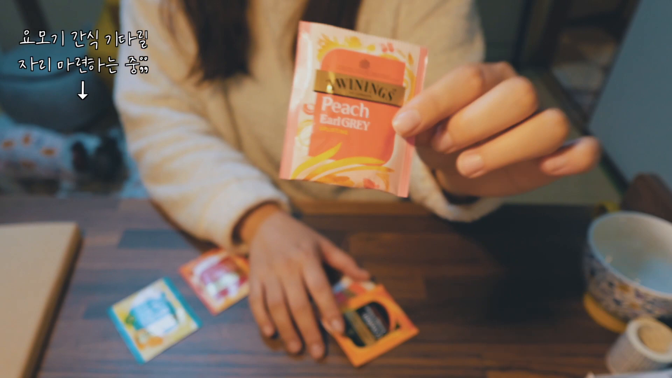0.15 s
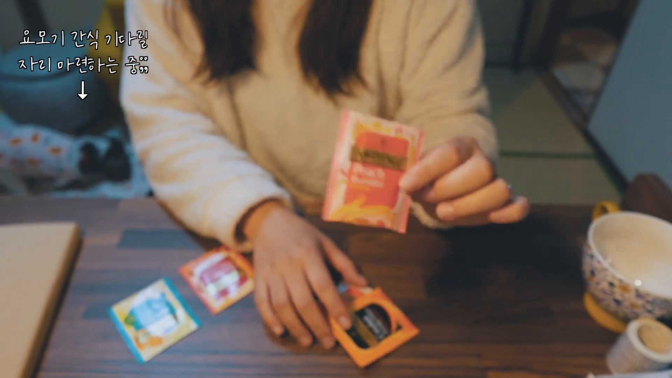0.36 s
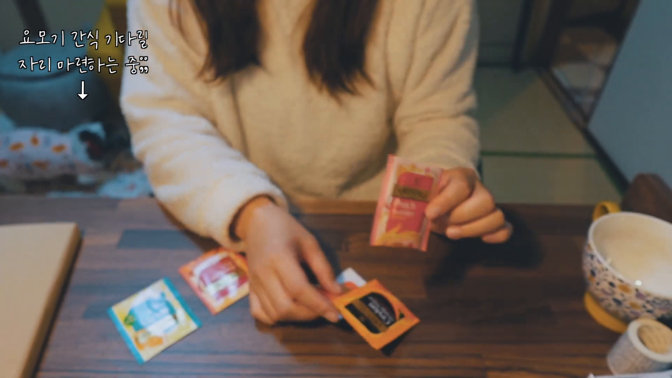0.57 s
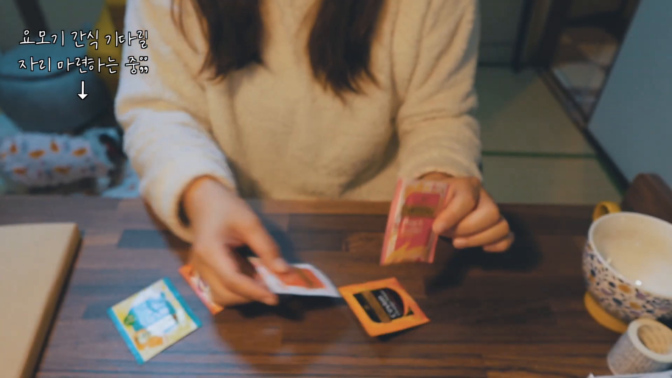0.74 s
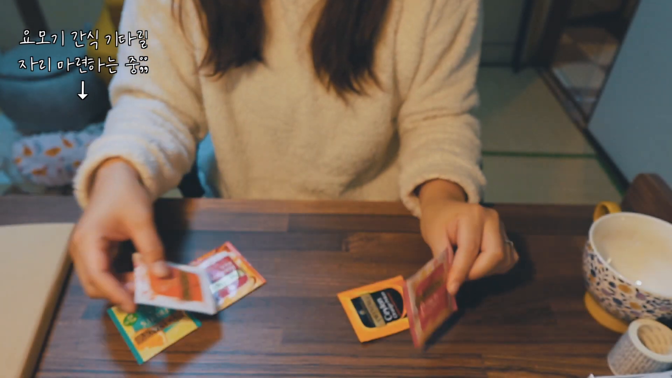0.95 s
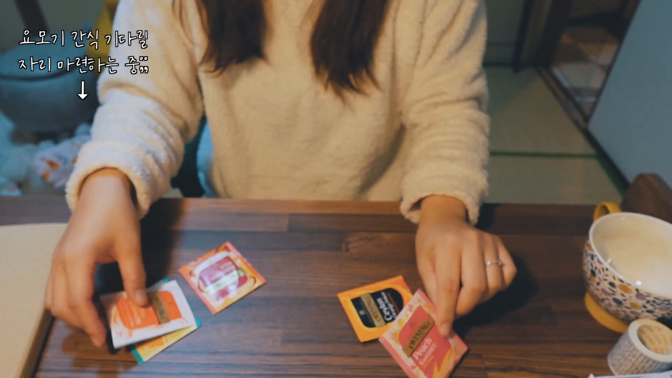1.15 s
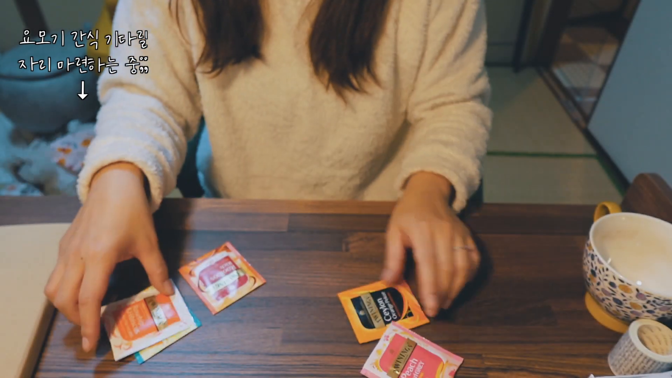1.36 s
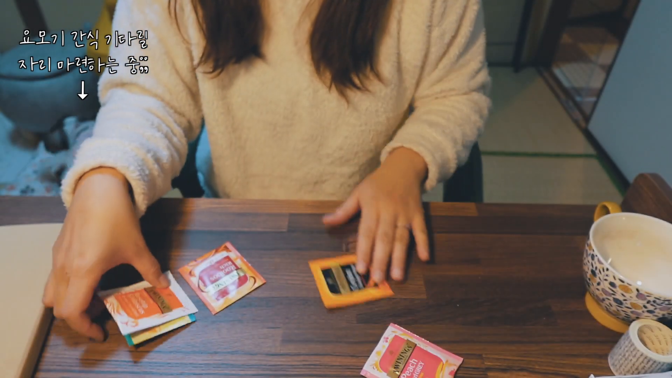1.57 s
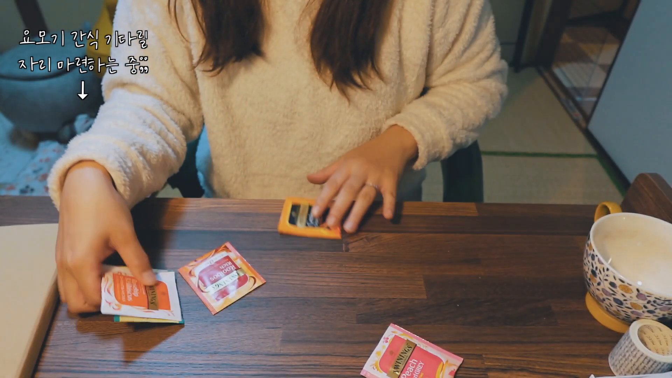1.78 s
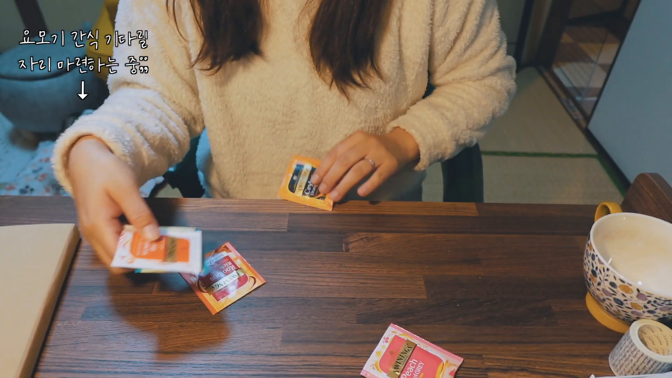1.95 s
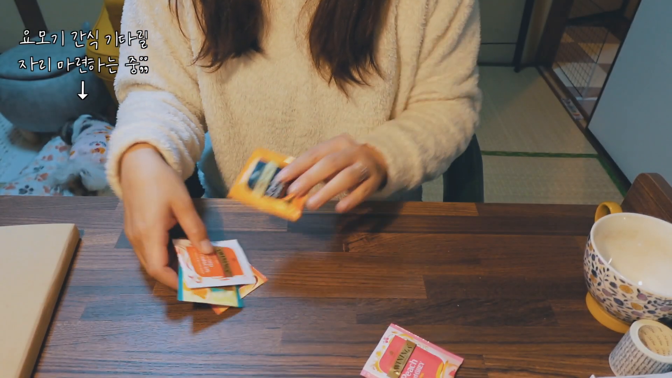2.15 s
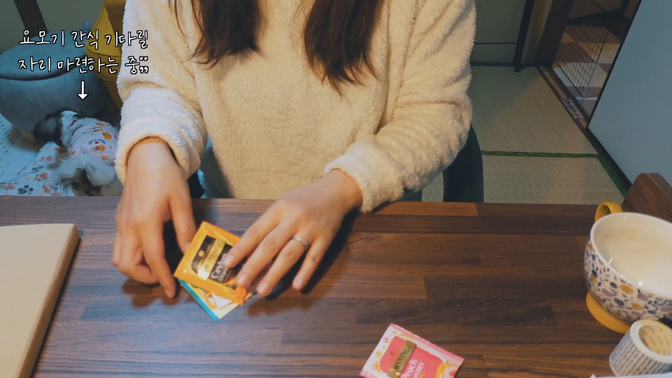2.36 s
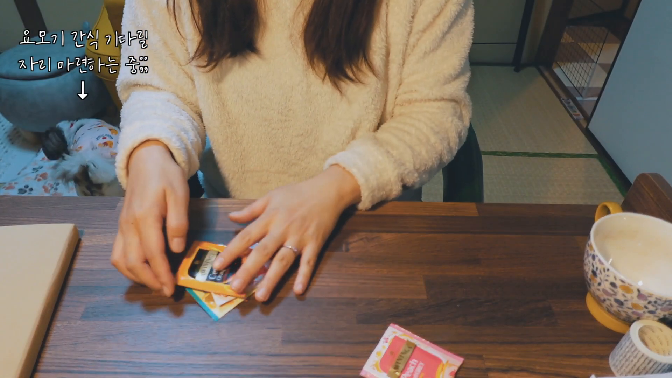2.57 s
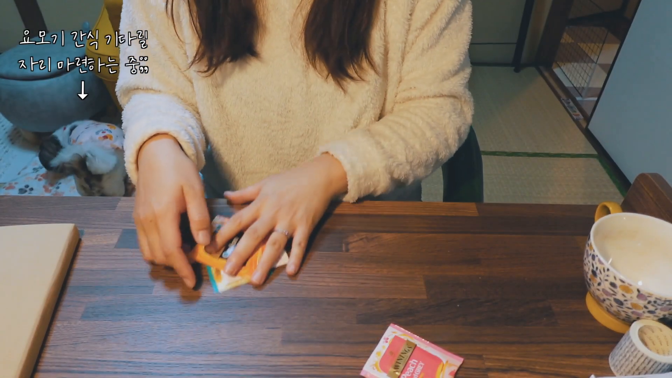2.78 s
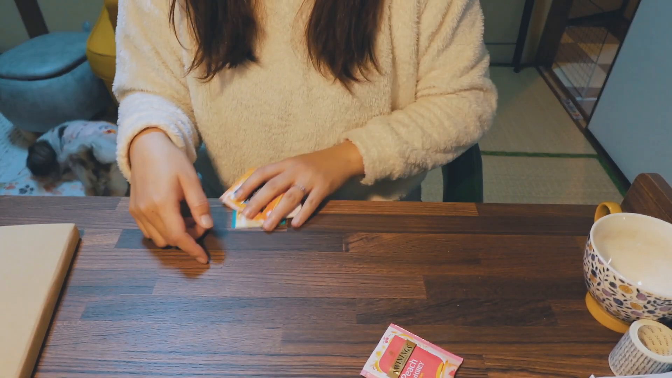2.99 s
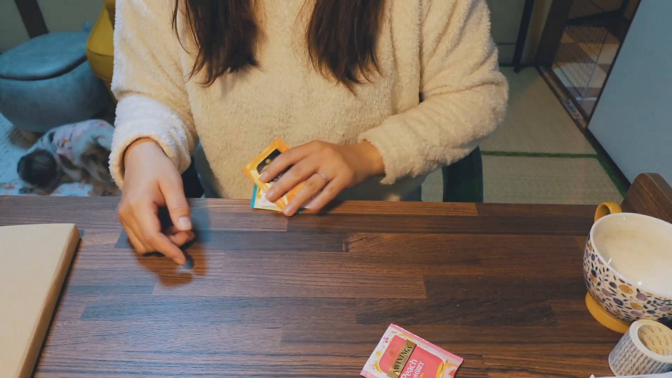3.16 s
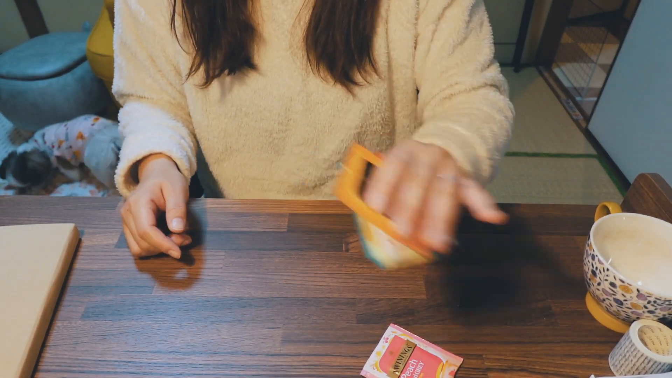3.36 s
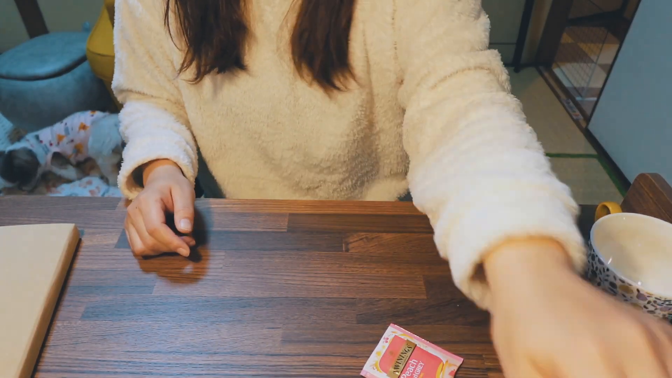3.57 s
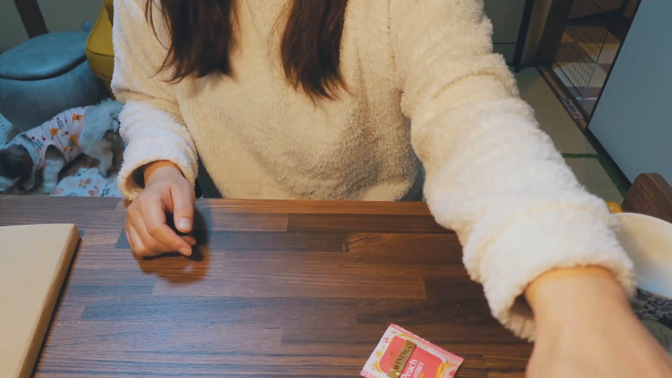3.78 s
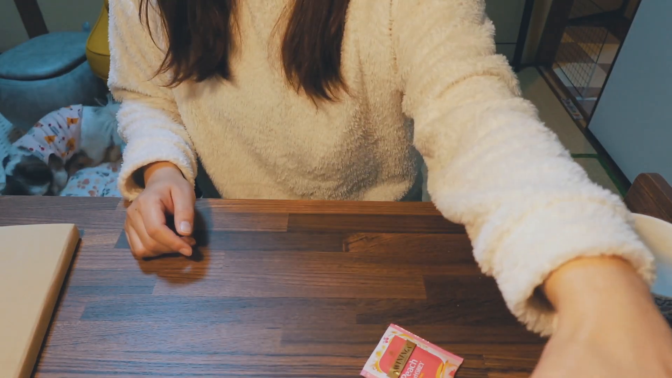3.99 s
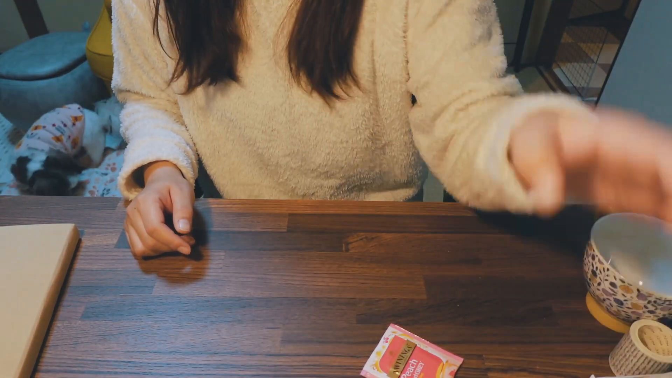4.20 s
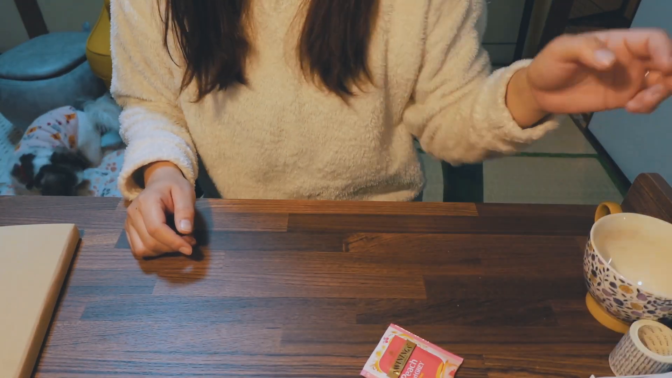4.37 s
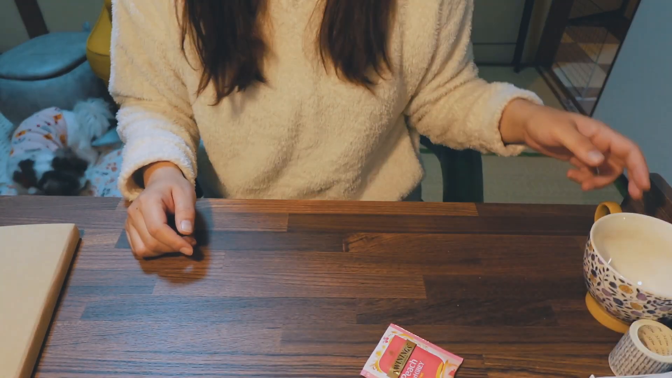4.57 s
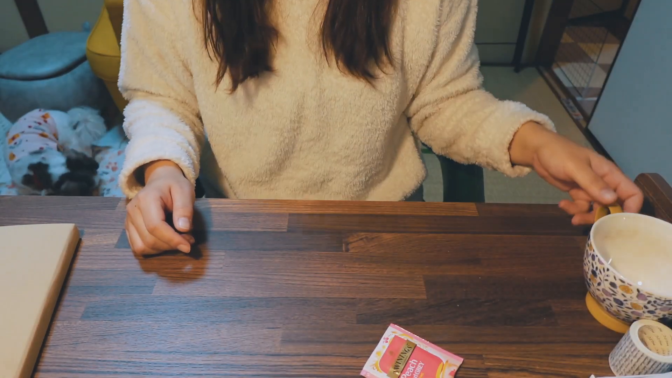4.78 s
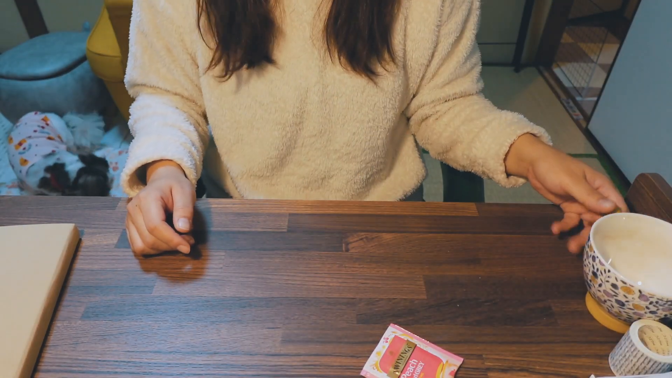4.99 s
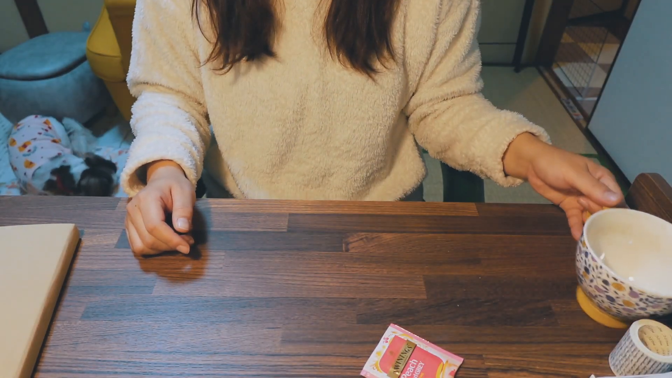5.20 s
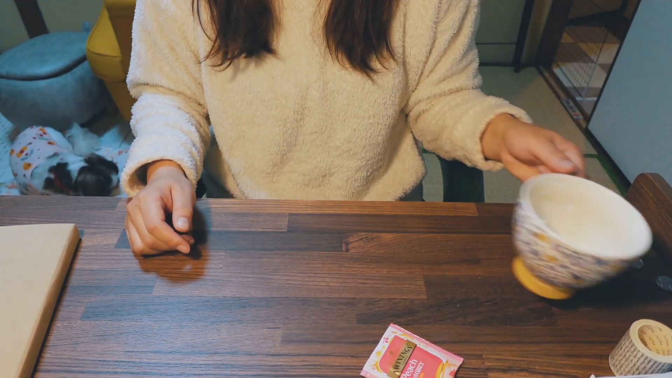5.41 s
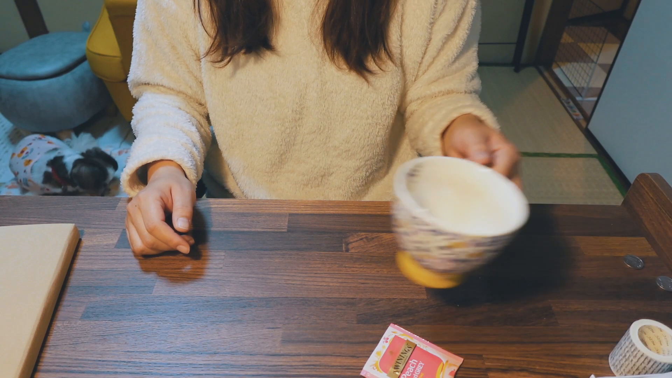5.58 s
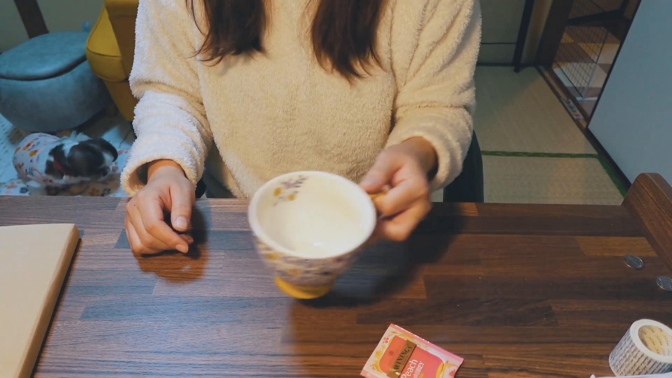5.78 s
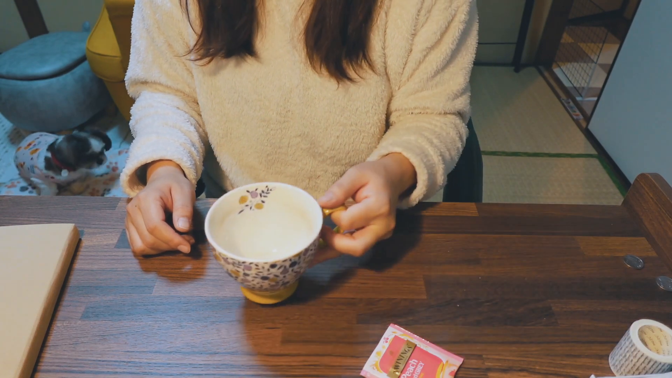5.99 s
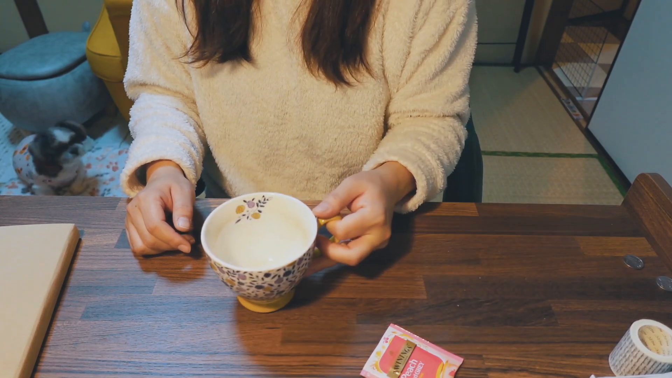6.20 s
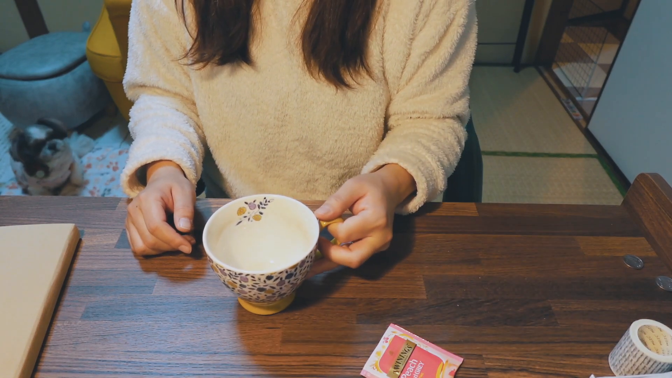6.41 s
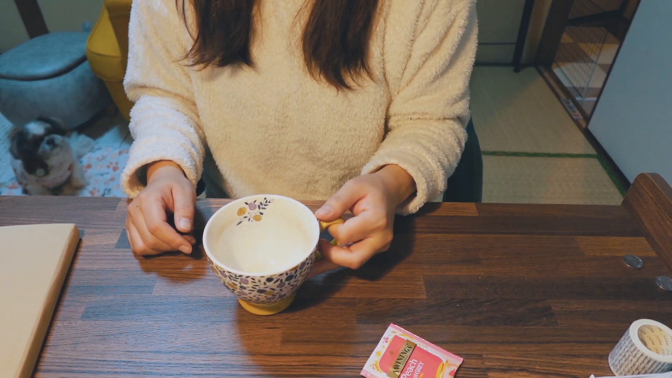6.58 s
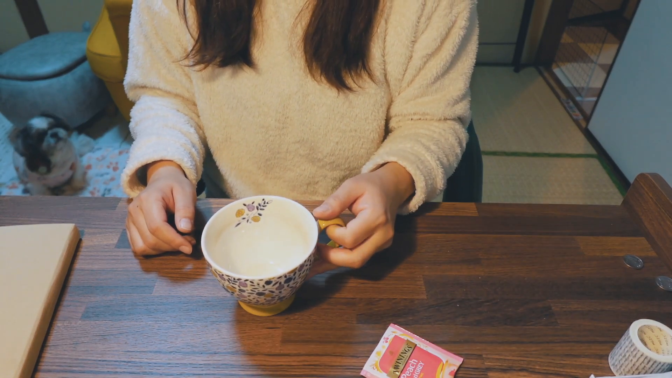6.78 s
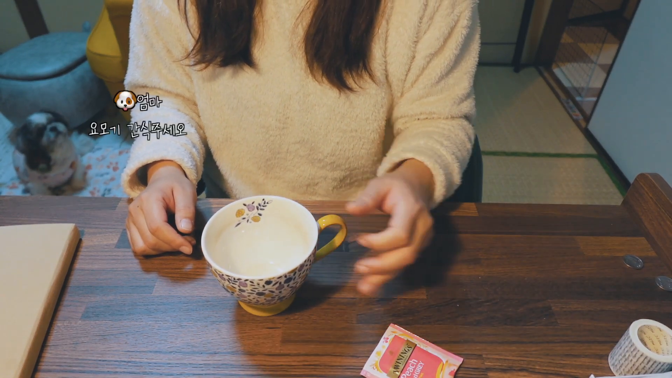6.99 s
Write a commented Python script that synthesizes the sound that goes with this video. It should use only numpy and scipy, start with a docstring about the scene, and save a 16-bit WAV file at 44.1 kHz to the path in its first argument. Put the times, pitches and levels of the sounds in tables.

```python
"""Over the low murmur of a quiet room, hands gather foil-lined paper tea sachets on a wooden table.
The paper rustles in strokes of shaped noise and snaps with short coloured clicks; blows ring the table.
Near 5 s a china cup is touched and dragged: faint sine rings, then grating noise and a hum of the wood.
Just after 6 s the cup is set down with knocks, rocks once more onto its foot, and rings faintly again."""
import sys
import numpy as np
from scipy import signal
from scipy.fft import rfft, irfft, next_fast_len
from scipy.io import wavfile
from scipy.ndimage import uniform_filter1d, map_coordinates

SR = 44100
rng = np.random.default_rng(int(sys.argv[2]) if len(sys.argv) > 2 else 0)


def put_to_file(sound):
    """Save the sound as 16-bit audio at rate SR, in the file named by the first command-line argument."""
    columns = np.atleast_2d(sound).T  # one column per channel
    safe = np.clip(columns, -1, 1)
    whole_steps = np.round(safe * 32767)
    wavfile.write(sys.argv[1], SR, whole_steps.astype(np.int16))


N = 310905  # length in samples, about 7 s

# strokes of the hands over the sachets; levels before the final balance of the layers:
# start_s, length_s, swell_db (rise from start to end), rustle_db, hiss_db (fine), rub_db (dull, of fingers)
HAND_STROKES = [(0.215, 0.19, -1, -52.5, -69, -59.5), (0.502, 0.16, -2, -44, -51, -52),
                (0.705, 0.14, -7, -45, -50.5, -53), (0.93, 0.0096, 7.5, -54, -59.5, -61),
                (1.038, 0.058, 1, -54.5, -73, -56), (1.138, 0.048, 1, -43.5, -53, -59),
                (1.27, 0.21, 2.5, -42.5, -55, -52.5), (1.529, 0.17, 1.5, -38.5, -39, -49.5),
                (1.773, 0.089, -0.5, -44.5, -42.5, -66), (1.881, 0.1, 1, -52, -42, -54.5),
                (2.06, 0.34, -4.5, -48.5, -47.5, -82), (2.363, 0.044, 4.5, -43.5, -49.5, -48),
                (2.447, 0.074, 0, -49.5, -58, -59), (2.613, 0.14, 8, -46, -56, -56.5),
                (2.779, 0.33, 2.5, -42, -39, -48), (3.148, 0.076, 3.5, -42, -45, -48),
                (3.352, 0.012, 7, -40.5, -49, -56), (3.425, 0.016, 11, -55, -56, -59),
                (3.49, 0.16, 0, -55.5, -65, -62), (3.684, 0.17, 0, -39, -46, -52),
                (3.923, 0.11, 2, -40.5, -53, -53)]


def handling():
    """A stroke grips quickly, arches and stops; then the paper settles slowly: rustle, hiss, rub gains."""
    return strokes(HAND_STROKES, grip_s=0.032, stop_s=0.024, settle_db=(-11, -10, -3), settle_s=0.12)


# colour of crinkling paper: pitch_hz, level_db
RUSTLE_COLOUR = [(500, -24.5), (1200, -11), (1900, -9.5), (2800, -1.5), (3600, -3.5), (4500, -4.5),
                 (6500, -5.5), (9000, -15), (16000, -42.5)]
# colour of the fine hiss of fibres: pitch_hz, level_db
HISS_COLOUR = [(2000, -31.5), (4000, 0), (6500, 0), (8000, 0.5), (9500, 0), (12000, -3), (16000, -8.5)]
# colour of fingers rubbing: pitch_hz, level_db
RUB_COLOUR = [(200, -16.5), (400, -6.5), (800, -3.5), (1400, 0), (2200, -3), (4000, -24)]
# a sachet held clear of the table rings as a hollow pouch: time_s, ringing_share (0-1)
HELD_CLEAR = [(0, 1), (.8, 0.9), (1.2, .5), (1.5, 0.3), (3.5, 0), (3.68, 0.6), (3.76, 0.5), (3.85, 0.2)]
# resonances of the hollow pouch: pitch_hz, width_hz, boost_db
POUCH_RESONANCES = [(1597, 153, 5), (2750, 400, 6.5), (4400, 250, 7)]
# where the handling happens, for the snaps too: time_s, left_minus_right_db
HAND_PLACE = [(1.2, -.4), (1.5, 0), (3.4, 0), (3.62, -2.2)]


def sliding(rustle, hiss, rub):
    """Paper catches and slips on wood and skin; some slides add a fine, even hiss."""
    seconds = np.arange(N) / SR
    held = np.clip(np.interp(seconds, *np.transpose(HELD_CLEAR)), 0, 1)
    crinkle = coloured(friction(rate=330, spread_db=0.5, smooth=1.43), RUSTLE_COLOUR)
    on_table = (1 - held) * crinkle
    in_hand = held * resonant(crinkle, POUCH_RESONANCES)
    paper = amp(-2.2) * rustle * shifting(on_table + in_hand, depth_db=3.0)

    even_hiss = coloured(rng.standard_normal(N), HISS_COLOUR)
    fibres = amp(0.5) * hiss * shifting(even_hiss, depth_db=2.0)

    skin = coloured(friction(rate=300, spread_db=3.5, smooth=1.0), RUB_COLOUR)
    fingers = amp(-2.0) * rub * shifting(skin, depth_db=2.5)

    # the pressure of the fingers never stays quite even
    pressure = amp(1.63 * wobble(70))
    left_minus_right_db = np.interp(seconds, *np.transpose(HAND_PLACE))
    sides = amp(np.outer([1, -1], left_minus_right_db) / 2)
    return in_room(sides * pressure * (paper + fibres + fingers), wet_db=-23, width=0.047)[:, :N]


def shifting(x, depth_db):
    """Paper changes its resonances as it bends: gains that drift in pitch and time."""
    z = signal.stft(x, nperseg=512)[2]
    field = rng.standard_normal(z.shape)
    for _ in range(2):
        field = uniform_filter1d(field, size=24, axis=1)
        field = uniform_filter1d(field, size=6, axis=0)
    return unit(signal.istft(z * amp(depth_db * unit(field)), nperseg=512)[1][:N])


# a sachet wall buckles; levels before a common boost:
# time_s, level_db, patch_hz (pitch of the flexing patch), treble_db (tilt), body_db (hollow body)
SACHET_SNAPS = [(0.461, -27, 2960, -27, 2), (0.5025, -9.5, 3930, -13, -4), (0.528, -24, 1460, -20, -5),
                (0.562, -21.5, 1520, -29, 0), (0.699, -10, 4400, 16, 3), (0.7142, -7, 4430, 12, 7),
                (0.7596, -16, 4300, 0, -1), (0.79, -19, 2800, 3, -2), (1.097, -22.5, 4650, 17, -4),
                (1.147, -15.5, 5040, 4, 0), (1.253, -16, 2420, 4, 4), (1.341, -22, 2220, -5, -3),
                (1.394, -19.5, 2947, 4, -6), (1.953, -21, 7380, -30, 2), (2.182, -19, 7740, 23, -14),
                (2.379, -25, 3370, -8, -8), (2.495, -23, 3100, 11, -7), (2.766, -26, 1586, -5, -3),
                (2.781, -20, 4440, -7, -3), (2.85, -19.5, 1100, -11, -6), (2.9193, -17, 1360, -19, -2),
                (3.021, -8.5, 4800, 4.5, 10), (3.091, -17, 2940, 1, 9.5), (3.1536, -18, 2190, -2.5, 6.5),
                (3.1674, -5, 7000, -10.5, 0), (3.203, -6, 6400, 6, -12), (3.214, -16, 3050, -1, 3),
                (3.283, -3, 3680, 5.5, -2), (3.515, -25.5, 2800, -20, 2), (3.7618, -20.5, 4750, 16, 10),
                (3.792, -17.5, 3040, -4, 10), (3.8932, -11.5, 1480, -8, 2), (4.02, -19.5, 3250, 9, 8),
                (4.0945, -30.5, 2540, 4, 2)]
# basic colour of buckling foil: pitch_hz, level_db
FOIL_COLOUR = [(100, -30.5), (500, -12), (1200, 0), (3000, 4), (6500, -2), (9000, -5.5), (12000, -14),
               (16000, -18.5)]


def snaps(rustle):
    """Each buckle is a short crack coloured by its patch of foil, then a brief flutter of the sheet."""
    travel_s = 0.000592  # travel time of a 3 kHz wave across the sheet
    crack_db, crack_t60_s = -10, 0.0064
    flutter_db, flutter_t60_s = -29, 0.07
    out = np.zeros((2, N))
    t = np.arange(2048) / SR
    hz = np.fft.rfftfreq(len(t), 1 / SR)
    # bending waves carry the treble across the sheet faster than the bass
    spread = np.exp(-4j * np.pi * travel_s * np.sqrt(3000 * hz))

    def hump(centre_hz, octaves):
        """A rounded peak in the spectrum around one pitch."""
        return 1 / (1 + (np.log2((hz + 1) / centre_hz) / octaves) ** 2)

    for s, db, patch_hz, treble_db, body_db in SACHET_SNAPS + creases(rustle):
        colour_db = along(FOIL_COLOUR, hz) + treble_db * hz / (hz + 7000)
        colour_db += 9 * hump(patch_hz, 0.27) + body_db * hump(1970, 0.38)
        pulse = irfft(rfft(causal(amp(colour_db))) * spread)

        crack = amp(crack_db - 60 * t / crack_t60_s)
        flutter = amp(flutter_db - 60 * t / flutter_t60_s)
        push = rng.standard_normal(len(t)) * (crack + flutter)
        push[0] = 1  # the first sharp click

        snap = signal.fftconvolve(push, pulse)[:len(t)]
        snap *= amp(db + 9.0) / np.linalg.norm(snap)
        pan_db = np.interp(s, *np.transpose(HAND_PLACE))
        add(out, s, in_room(placed(beamed(snap), pan_db), wet_db=-17, width=0.26))
    return out


def creases(rustle):
    """Small creases give way by chance, as strong as the rustle under them; rows like SACHET_SNAPS."""
    per_s, over_rustle_db, scatter_db, typical_hz = 16, 14.5, 1.5, 2970
    first = HAND_STROKES[0][0]
    last = HAND_STROKES[-1][0] + HAND_STROKES[-1][1]
    count = int(per_s * (last - first))
    when, size, pitch = rng.random(size=(count, 3)).T
    times = first + (last - first) * when
    rustle_db = 20 * np.log10(rustle[(times * SR).astype(int)])
    levels_db = rustle_db + over_rustle_db + scatter_db * (2 * size - 1)
    pitches_hz = typical_hz * 2 ** (2 * pitch - 1)  # up to an octave either way
    return [(s, db, hz, 0, 0) for s, db, hz in zip(times, levels_db, pitches_hz)]


def beamed(snap):
    """A bent sheet radiates in lobes, so each pitch reaches left and right a little differently."""
    lobe_hz, uneven_db = 1800, 1.0
    hz = np.fft.rfftfreq(len(snap), 1 / SR)
    knots = rng.standard_normal(size=(2, 32))
    level, phase = (map_coordinates(row, [hz / lobe_hz], mode="mirror") for row in knots)
    difference_db = uneven_db * (level + 1j * phase)
    return irfft(rfft(snap) * amp(np.outer([1, -1], difference_db) / 2))


# light touches that ring the cup; levels before a common trim: time_s, level_db, pitch_hz, t60_s (60 dB fade)
CUP_PINGS = [(4.867, -50, 5280, 0.061), (4.865, -71, 8441, .3), (5.079, -52, 4000, 0.12),
             (5.08, -69, 8441, 0.45), (6.891, -60, 4194, 0.33), (6.89, -67, 8226, .5)]
# colour of the cup's foot grating on wood: pitch_hz, level_db
GRATING_COLOUR = [(350, -27), (600, 3.5), (900, -6.5), (1500, 1.5), (2000, -1), (2800, -5), (4400, -20),
                  (5200, -32), (15500, -40)]
# colour of its sharper grit: pitch_hz, level_db
SHARP_COLOUR = [(1500, -12), (4000, 3), (7000, -5.5), (10000, -7.5), (15500, -16)]
# resonances of the dragged cup on the wood: pitch_hz, width_hz, boost_db
CUP_RESONANCES = [(915, 65, 17), (1157, 50, 9.5), (1410, 50, 7.5), (2600, 150, 3.5), (4200, 290, 9.5),
                  (6360, 290, 8.5), (8400, 150, 3.5)]


def cup():
    """The unglazed foot grates on the wood, sharpest just as it lifts; fingers ring the china faintly."""
    def scrape(colour):
        """Foot and wood catch and slip, heard through the cup's resonances."""
        slips = friction(rate=440, spread_db=1, smooth=0.7)
        return resonant(coloured(slips, colour), CUP_RESONANCES)

    grating, grit, _ = pulls()
    china = grating * scrape(GRATING_COLOUR) + grit * scrape(SHARP_COLOUR)
    china *= amp(1.6 * wobble(160))
    t = np.arange(SR // 2) / SR
    for s, db, hz, t60_s in CUP_PINGS:
        # a finger on the china damps the ring unevenly
        touch = amp(3.2 * wobble(95)[:len(t)])
        fade = amp(db - 2.0 - 60 * t / t60_s)
        soft_start = 1 - np.exp(-t / 0.0044)
        add(china, s, touch * fade * soft_start * np.sin(2 * np.pi * hz * t))
    return in_room(placed(china, pan_db=-1.2), wet_db=-5.5, width=0.42)[:, :N]


# pulls on the cup; levels before colour and unevenness:
# start_s, length_s, swell_db, grating_db, grit_db (sharp), drone_db (of the table)
CUP_PULLS = [(5.08, 0.036, 0.5, -50, -66, -70), (5.17, 0.071, 10, -45.5, -75, -48.5),
             (5.245, 0.025, 5, -47.5, -48.5, -42.5)]


def pulls():
    """Gains for the grating, grit and table drone as the cup's foot is pulled."""
    return strokes(CUP_PULLS, grip_s=0.026, stop_s=0.012, settle_db=-16, settle_s=0.15)


# blows on the table by fingers and cup; levels before a common boost:
# time_s, level_db, hardness_hz (a harder contact reaches higher)
TABLE_KNOCKS = [(1.276, -34, 250), (1.576, -25.5, 335), (1.639, -38, 350), (1.953, -42, 900),
                (2.9, -32.5, 700), (5.246, -28, 297), (6.2007, -12, 1560), (6.232, -26, 2000),
                (6.25, -31, 2500), (6.264, -38, 3020), (6.312, -25.5, 220), (6.322, -40, 3020),
                (6.6995, -29, 2200), (6.7021, -17.5, 506), (6.706, -17.5, 220)]


def knocks():
    """Blows ring the table; a soft contact reaches only its low modes."""
    out = np.zeros((2, N))
    ring = table_ring()
    t = np.arange(len(ring)) / SR
    for s, db, hard_hz in TABLE_KNOCKS:
        # the spot under the blow heaves briefly
        heave = np.sin(2 * np.pi * 600 * t) * amp(9.5 - 60 * t / 0.012)
        heave *= 1 - np.exp(-t / 0.0036)
        # the crowded upper modes clatter
        band = signal.butter(1, [450, 2200], "band", fs=SR)
        rattle = signal.lfilter(*band, rng.standard_normal(len(t)))
        clatter = rattle * amp(-13.0 - 60 * t / 0.11)

        softness = signal.butter(2, min(hard_hz, SR / 4), fs=SR)
        blow = signal.lfilter(*softness, ring + heave + clatter)
        add(out, s, in_room(placed(amp(db + 2.5) * blow, pan_db=1.5), wet_db=-16, width=0.24))
    return out


# modes of the table top, at levels relative to each other: pitch_hz, level_db, t60_s (60 dB fade)
TABLE_MODES = [(71.3, -30, 0.44), (89.3, -28, 0.73), (138, -9, 0.34), (153.5, -9.5, 0.12),
               (203.6, 5.5, 0.13), (281, -7, 0.26), (315.5, -6, 0.15), (409.5, -10, 0.19), (459, -10, 0.21),
               (519, 1, 0.079), (568, -7.5, .12), (632, -18.5, 0.22), (675, -10, 0.01), (798, -1, 0.099),
               (878, -12, 0.098), (940, -5, 0.079), (1001, -7.5, 0.089), (1100, -9.5, 0.066),
               (1278, -18, 0.089), (1445, -21, 0.14), (1646, -10.5, 0.031), (1750, -14, 0.056)]


def table_ring():
    """The table's answer to one blow; neighbouring modes swing in opposite directions."""
    t = np.arange(SR // 2) / SR
    ring = np.zeros(len(t))
    for k, (hz, db, t60_s) in enumerate(TABLE_MODES):
        ring += (-1) ** k * amp(db - 60 * t / t60_s) * np.sin(2 * np.pi * hz * t)
    return ring / np.abs(ring).max()


# hands pressing on the table as they slide: start_s, length_s, swell_db, drone_db
HAND_PRESSES = [(1.35, 0.11, 4, -53.5), (2.62, 0.54, 1.5, -55.5)]


def drone():
    """Pressing hands and the dragged cup make the table hum in its modes."""
    shaken = signal.fftconvolve(friction(rate=300, spread_db=3.5, smooth=0.84), table_ring())[:N]
    hands, = strokes(HAND_PRESSES, grip_s=0.067, stop_s=0.11, settle_db=-15.5, settle_s=0.25)
    cup_drone = pulls()[2]
    return placed((hands + cup_drone) * unit(shaken), pan_db=3.0)


def radiated(x):
    """Air slips round the table's edge, so that it sends out no deep bass."""
    return signal.sosfilt(signal.butter(4, 75, "high", fs=SR, output="sos"), x)


# colour of the room's murmur: pitch_hz, level_db
AIR_COLOUR = [(25, -50), (40, -30.5), (52, -45), (68, -3.5), (100, -10.5), (135, -4.5), (250, -2.5),
              (360, -10.5), (520, -14), (820, -14), (1120, -18), (1800, -23), (4450, -31), (9000, -37),
              (15800, -40.5)]
# low resonances of the room: pitch_hz, width_hz, boost_db
ROOM_BOOMS = [(134.5, 13, 6), (203, 14, 1), (255.5, 35, 4.5)]
# stereo width of the murmur: pitch_hz, side_minus_mid_db
MURMUR_WIDTH = [(60, -13), (180, -12.5), (550, -6), (1650, -4), (4970, -4), (15000, -17.5)]
# stereo balance of the murmur: pitch_hz, left_minus_right_db
MURMUR_PAN = [(60, 1.5), (180, 1.4), (550, 0.63), (1650, -1.8), (4970, -0.72), (15000, 0.0)]


def air():
    """The steady low murmur of the room is coloured noise, its width and balance varying with pitch."""
    noise = coloured(rng.standard_normal((2, N)), AIR_COLOUR)
    mid, side = resonant(noise, ROOM_BOOMS)
    side = filtered(side, lambda hz: amp(along(MURMUR_WIDTH, hz)))
    stereo = np.array([mid + side, mid - side])
    return amp(-51.5) * filtered(stereo, lambda hz: amp(np.outer([1, -1], along(MURMUR_PAN, hz)) / 2))


# how long the room's echo takes to fade by 60 dB: pitch_hz, t60_s
ROOM_FADE = [(100, 0.21), (500, 0.55), (3000, 0.27), (8000, 0.11), (16000, 0.261)]


def in_room(x, wet_db, width):
    """The direct sound and a diffuse noise tail that fades at its own speed for each pitch."""
    hz, t, z = signal.stft(rng.standard_normal((2, SR // 3)), SR, nperseg=256)
    fade = amp(-60 * t / along(ROOM_FADE, hz)[:, None]) * (t > 0)
    mid, side = signal.istft(z * fade, SR, nperseg=256)[1]
    tail = np.array([mid + width * side, mid - width * side])
    tail *= amp(wet_db) / np.linalg.norm(mid)
    tail[:, 0] += 1  # the direct sound
    return signal.fftconvolve(np.atleast_2d(x), tail, axes=1)


def strokes(rows, grip_s, stop_s, settle_db, settle_s):
    """A gain curve for each level column: attack, arched hold, then a release with a faint tail."""
    arch_db = 1  # the middle of a stroke over its ends
    t = np.arange(N) / SR
    power = 0
    for start, length, swell_db, *levels_db in rows:
        before = np.maximum(start - t, 0)
        after = np.maximum(t - start - length, 0)
        progress = np.clip((t - start) / length, 0, 1)
        attack = np.exp(-before / grip_s)
        hold = amp(swell_db * (progress - 0.5) + arch_db * (np.sin(np.pi * progress) - 0.5))
        settling = np.outer(amp(settle_db), np.exp(-after / settle_s))
        release = np.maximum(np.exp(-after / stop_s), settling)
        power = power + (np.outer(amp(levels_db), attack * hold) * release) ** 2
    return np.sqrt(power)


def friction(rate, spread_db, smooth):
    """Tiny slips of uneven size, about rate a second, over a smooth rush."""
    size = amp(spread_db * np.minimum(rng.exponential(size=N), np.pi))
    happens = rng.random(N) < rate / SR
    slips = happens * rng.choice([-1, 1], N) * size
    return unit(unit(slips) + smooth * rng.standard_normal(N))


def resonant(x, peaks):
    """x with (pitch_hz, width_hz, boost_db) resonances, at rms 1."""
    def response(hz):
        """All boosts added in dB."""
        return amp(sum(db / (1 + ((hz - centre) / wide) ** 2) for centre, wide, db in peaks))
    return unit(filtered(x, response))


def coloured(x, spectrum):
    """x filtered by the given colour, at rms 1."""
    return unit(filtered(x, lambda hz: amp(along(spectrum, hz))))


def filtered(x, response):
    """x times a response that depends on pitch."""
    m = next_fast_len(N + SR // 2)
    return irfft(rfft(x, m) * response(np.fft.rfftfreq(m, 1 / SR)), m)[..., :N]


def causal(gain):
    """The sharpest impulse response that has this gain per frequency (minimum phase)."""
    cepstrum = irfft(np.log(np.maximum(gain, 1e-6)))
    half = len(cepstrum) // 2
    fold = np.r_[1, np.full(half - 1, 2), np.zeros(half)]
    return irfft(np.exp(rfft(cepstrum * fold)))


def wobble(rate):
    """A smooth random curve with rate knots a second."""
    knots = rng.standard_normal(int(N * rate / SR) + 4)
    return map_coordinates(knots, [np.arange(N) * rate / SR])


def placed(x, pan_db):
    """Place a sound a little to the left (+) or right (-)."""
    return x * amp(np.array([[pan_db], [-pan_db]]) / 2)


def add(track, s, sound):
    """Mix a sound into a track at time s."""
    part = track[..., round(s * SR):][..., :sound.shape[-1]]
    part += sound[..., :part.shape[-1]]


def along(points, hz):
    """Read (pitch_hz, value) points on a log pitch axis."""
    f, v = np.transpose(points)
    return np.interp(np.log(hz + 1), np.log(f + 1), v)


def amp(db):
    """Decibels to gain."""
    return 10 ** (np.asarray(db) / 20)


def unit(x):
    """Scale to rms 1."""
    return x / np.sqrt(np.mean(x ** 2) + 1e-20)


def scene():
    """Sachets, cup and table in the room."""
    rustle, hiss, rub = handling()
    sachets = sliding(rustle, hiss, rub) + snaps(rustle)
    table = radiated(knocks() + drone())
    return sachets + cup() + table + air()


def record(dry):
    """A very steep low-pass at 16 kHz takes away the highest treble."""
    return filtered(dry, lambda hz: 1 / np.sqrt(1 + (hz / 16000) ** 120))


dry = scene()
out = record(dry)
put_to_file(out)
```